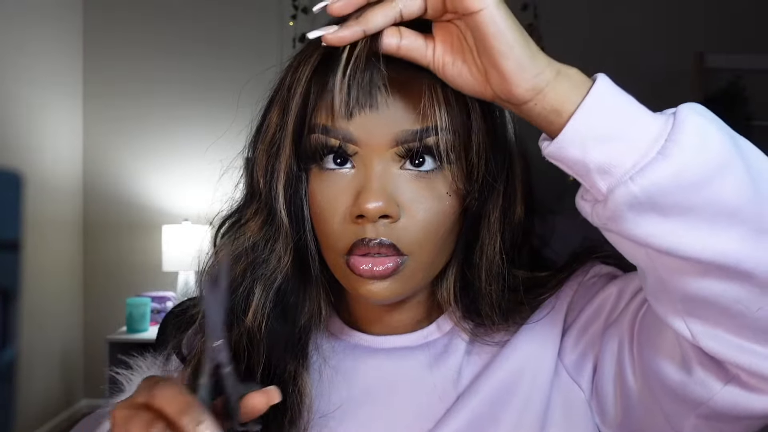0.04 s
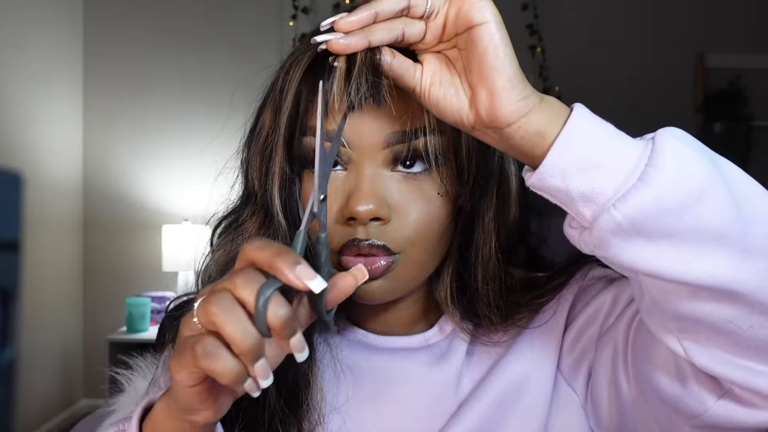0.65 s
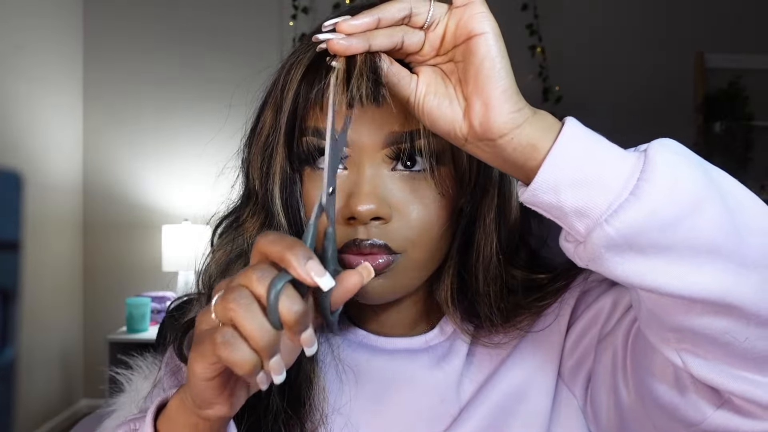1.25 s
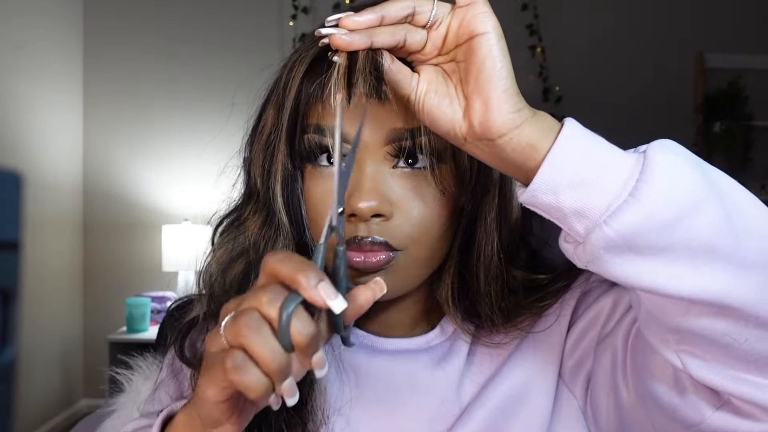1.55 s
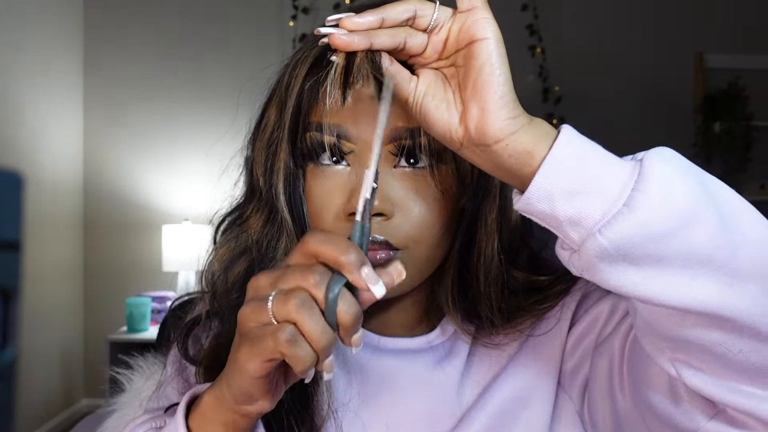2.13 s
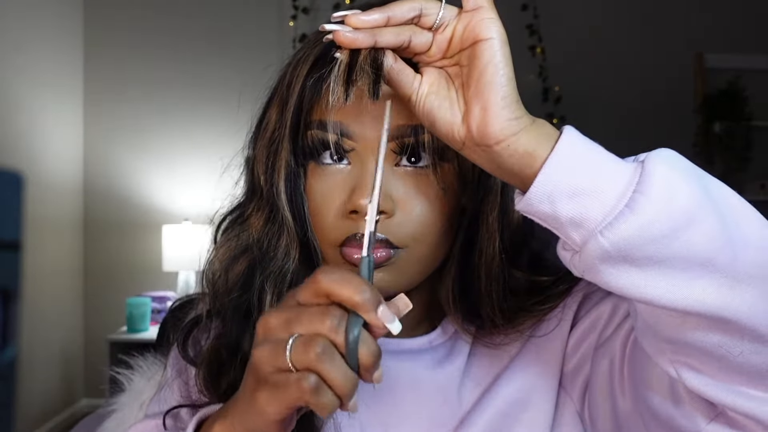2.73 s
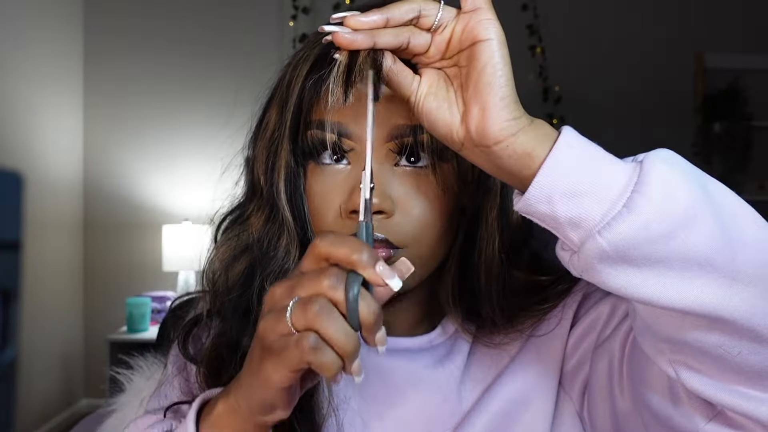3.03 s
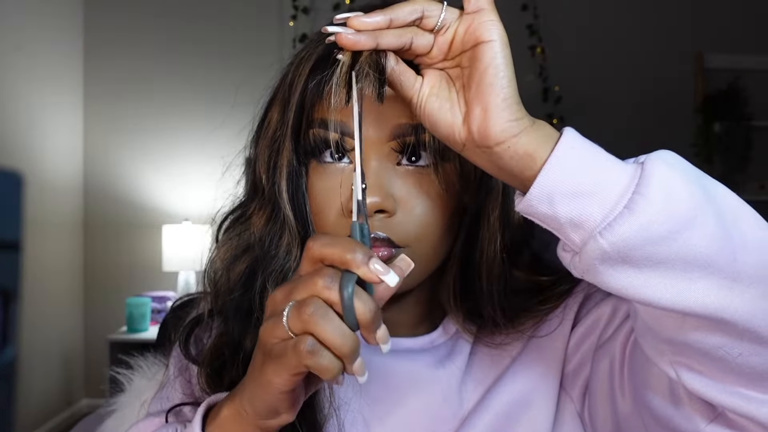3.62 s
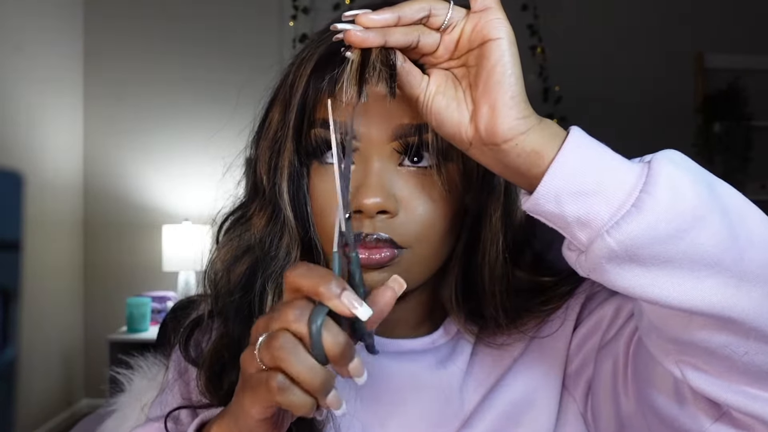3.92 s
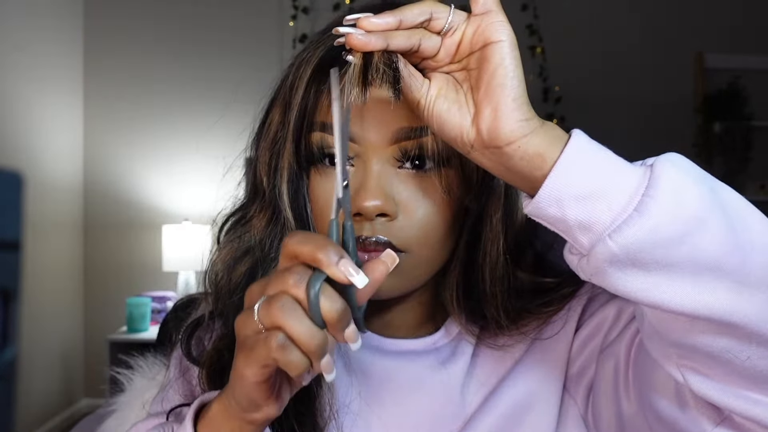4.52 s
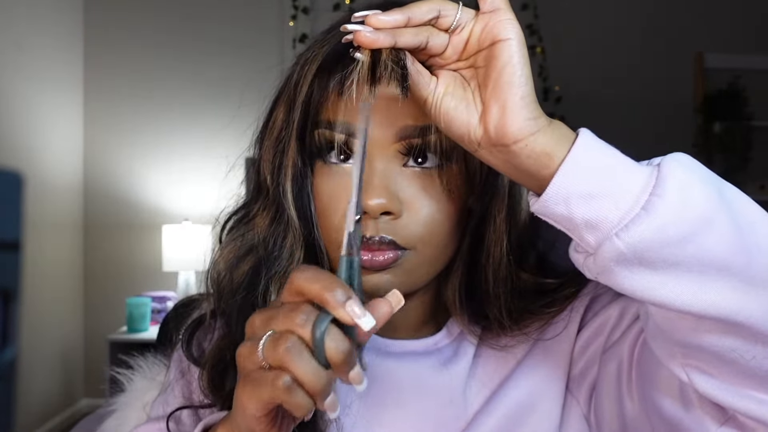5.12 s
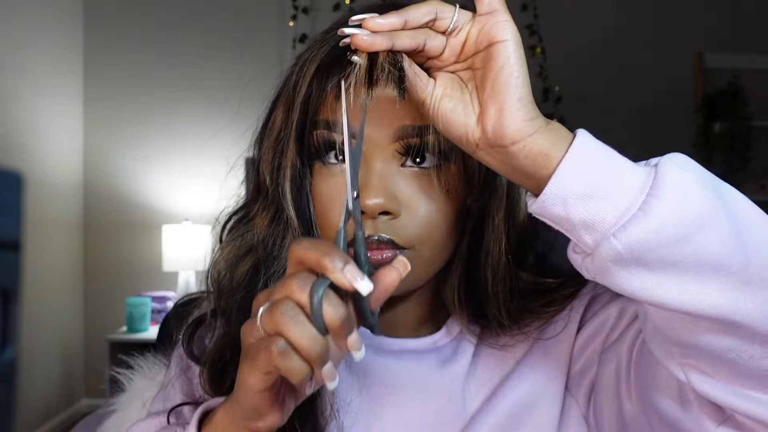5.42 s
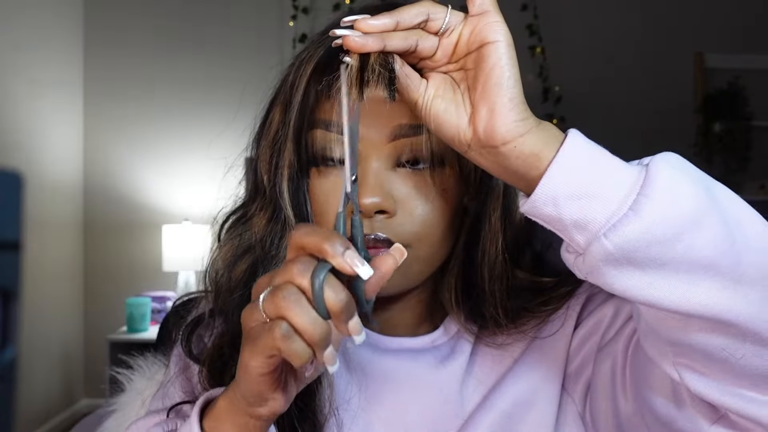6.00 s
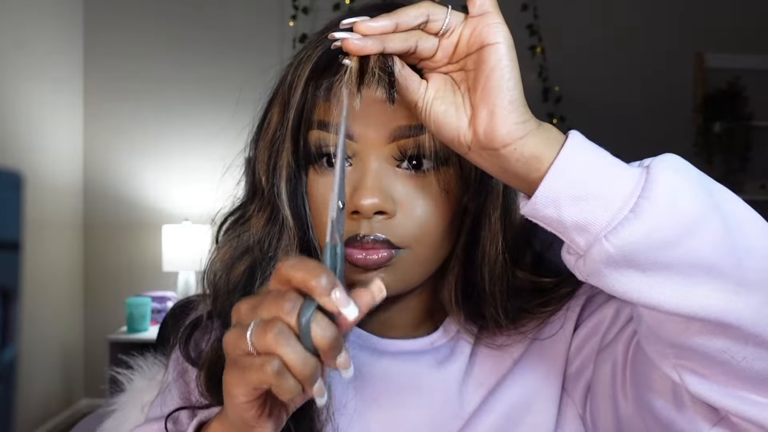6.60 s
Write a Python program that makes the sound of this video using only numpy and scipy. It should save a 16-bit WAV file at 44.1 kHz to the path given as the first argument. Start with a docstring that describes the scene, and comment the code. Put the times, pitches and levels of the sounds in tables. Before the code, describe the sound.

Steel scissors snip through hair up close about a dozen times, each crisp crunch ending in a metallic clack, in a quiet room.

```python
"""A lock of hair squeaks faintly between the fingers, then steel scissors trim a fringe close by.
Each snip is a swelling crunch of hairs that ends in a clack as the scissors shut.
The blades then scrape open again, each time with a short falling squeak.
One soft, dull knock comes from farther off. The small, quiet bedroom adds a brief echo,
and a soft, steady rush of air fills it."""
import sys
import numpy as np
from scipy import signal
from scipy.fft import rfft, irfft
from scipy.io import wavfile

SR = 44100
rng = np.random.default_rng(int(sys.argv[2]) if len(sys.argv) > 2 else 0)


def master_out(mix):
    """Clip the mix to full scale and print it as 16-bit PCM to the path in sys.argv[1]."""
    frames = np.transpose(np.atleast_2d(mix))
    ceiling = np.clip(frames, -1, 1)
    pcm = np.round(ceiling * 32767).astype(np.int16)
    wavfile.write(sys.argv[1], SR, pcm)


N = 297675
TIME = np.arange(N) / SR

# Levels in the tables are relative: the functions set the final loudness.
# the scissors shut: (time [s], level [dB])
SNIPS = [(0.9493, -14), (1.3666, -12), (1.7325, -11.5), (2.1757, -11.5), (2.6407, -13), (3.1244, -12.5),
         (3.7252, -16.5), (4.2158, -12.5), (4.5999, -15.5), (4.9661, -14), (5.5783, -14.5), (6.106, -12),
         (6.5097, -14)]
# bite, how hard the edges press together, as the treble it gives a snip: (time [s], bite [dB])
BITE = [(0.95, -8.5), (1.4, -10.5), (2.17, -11), (2.64, -18.5), (3.7, -20), (4.6, -16.5), (6.1, -12.5)]
# the pitches that colour the brief, metallic clack: (frequency [Hz], width [Hz], level [dB])
CLACK_PITCHES = [(1220, 260, -21), (1910, 230, -10.5), (2620, 87, -22), (3440, 290, -13), (4270, 280, -9.5),
                 (4770, 318, 4), (4934, 158, 2.5), (6110, 330, -5), (6700, 350, -13), (7700, 210, -12),
                 (8750, 430, -23)]
# body and treble of the clack, averaged over all directions: (frequency [Hz], level [dB])
CLACK_BODY = [(300, -63), (1100, -14), (1900, -0.5), (2500, -9), (3300, -1), (4300, 13.5), (5100, 11.5),
              (6200, -2), (9000, -28)]
CLACK_TREBLE = [(3500, -25.5), (5000, -1), (6000, 4), (7300, -2), (9000, -4.5), (10500, -11.5),
                (15000, -12)]
# the sound of edges rattling, hairs being cut and blades sliding: (frequency [Hz], level [dB])
RATTLE_SPECTRUM = [(200, -70), (1500, -43), (3000, -14), (5000, 0), (6300, 7), (7500, -16), (9500, -1.5),
                   (10800, -13), (12300, -13), (15000, -23), (16000, -17)]
CRUNCH_SPECTRUM = [(600, -39), (1100, -2.5), (1600, -17), (2400, -7.5), (3200, -2.5), (3700, -11),
                   (4800, -6), (6000, -1.5), (7200, -7), (8300, -8.5), (11000, -14.5), (16000, -18)]
SLIDE_SPECTRUM = [(800, -21), (1800, -14.5), (2800, -7), (3700, -10.5), (5000, -2), (6300, -3), (7500, -7),
                  (9500, -13), (12000, -17), (16000, -22)]
# the blades slide open: (time [s], level [dB])
OPENINGS = [(1.0733, -32), (1.4698, -34), (1.8558, -36.5), (2.329, -42.5), (2.7867, -47), (3.282, -48.5),
            (3.8637, -42), (4.359, -39), (4.7455, -38.5), (5.132, -40), (5.758, -43), (6.2641, -37.5),
            (6.668, -42.5)]
# hair rubs between the fingers: (time [s], length [s], squeak level [dB], hiss level [dB])
RUBS = [(0.32, 0.074, -54, -64), (0.466, 0.011, -50.5, -54.5), (0.492, 0.065, -57.5, -63.5),
        (0.617, 0.093, -56, -59), (0.827, 0.049, -57, -63)]
# the squeak sinks as the fingers slow down along the lock: (time [s], pitch [Hz])
SQUEAK_PITCH = [(0.32, 3180), (0.355, 3190), (0.39, 2710), (0.5, 2600), (0.68, 2534), (0.88, 2500)]
# the hiss of rubbed hair: (frequency [Hz], level [dB])
HISS_SPECTRUM = [(1800, -15), (3200, -3), (4100, 1.5), (4700, -5), (5600, 2), (7000, -7), (8500, 3.5),
                 (9800, -1.5), (10700, -16), (16000, -34)]
# a soft, dull knock: (time [s], level [dB])
KNOCKS = [(1.604, -41)]
# its ringing tones: (frequency [Hz], width [Hz], level [dB])
KNOCK_TONES = [(546, 170, -3.5), (435, 60, 3.5), (594, 21, -2)]
# echoes off nearby surfaces: (delay [s], left level [dB], right level [dB])
ECHOES = [(.0087, -25, -23), (.0118, -22, -19), (.0224, -24, -22)]
# the tail, the wash of sound that lingers in the room: (frequency [Hz], level [dB])
TAIL_SPECTRUM = [(300, 15.5), (600, 8.5), (1200, 5), (2500, 7), (3400, 4.5), (4300, 2.5), (5500, 2),
                 (7000, 2), (9000, 4), (15000, -2)]
# how long it lingers: (frequency [Hz], time to fade by 60 dB [s])
TAIL_FADE = [(400, 0.4), (2400, 0.41), (5000, 0.3), (14000, 0.34)]
# how alike it is left and right; the bass is wider: (frequency [Hz], likeness [0 to 1])
TAIL_LIKENESS = [(1000, 0.56), (2700, 0.73), (4000, 0.9), (8000, 1)]
# the rush of air: (frequency [Hz], level [dB])
AIR_SPECTRUM = [(15, -79.5), (25, -40.5), (145, -6), (263, -3), (293, -5), (326, -5.5), (405, -6),
                (516, -9.5), (607, -3), (887, -12.5), (1610, -12), (2610, -20.5), (6560, -27),
                (13600, -32.5), (16000, -34)]
# drones in the rush: (frequency [Hz], width [Hz], left level [dB], right level [dB])
AIR_DRONES = [(438, 56, -72, -73), (621, 57, -87, -63.5), (1674, 100, -76.5, -80.5)]
# how alike the rush is left and right: (frequency [Hz], likeness [0 to 1])
AIR_LIKENESS = [(60, 0.37), (250, .5), (600, 0.48), (1500, 0.36), (5000, 0.72), (14000, 1)]
# which way it leans: (frequency [Hz], left minus right [dB])
AIR_BALANCE = [(60, 9), (130, -1), (260, 1), (500, -5.5), (1000, 2.5), (8000, -0.5)]

CLACK_DELAY_S = 0.001   # the clack sounds this long after each snip's time, just after the crunch stops
USUAL_BITE_DB = -13.0
OPPOSITE = np.array([[1], [-1]])   # plus on the left, minus on the right


def clacks(level_db=17.0, vary_db=2.0, upper_hz=5500):
    """The scissors hit their stop with a metallic clack; more bite makes its upper pitches louder."""
    times, snip_db, bite_db = snips()
    clack = np.zeros(N)
    for hz, width_hz, pitch_db in CLACK_PITCHES:
        boost_db = bite_db - USUAL_BITE_DB if hz > upper_hz else 0
        strength_db = snip_db + pitch_db + boost_db + rng.normal(0, vary_db, len(times))
        clack += resonate(taps(times + CLACK_DELAY_S, strength_db + level_db), hz, width_hz)
    # narrow blades give off no bass, and the time in contact softens the top
    clack = keep_band(clack, "band", [900, 8800], order=3)
    # high and low waves cross the steel at different speeds, so the clack takes a cycle to build
    return clack - 2 * resonate(clack, hz=5000, width_hz=6000)


def clacks_to_walls(treble_db=15.0, bite_share=0.7):
    """Sound reaches the walls from every side of the scissors, so the clack's pitches blur together."""
    times, snip_db, bite_db = snips()
    stops = times + CLACK_DELAY_S
    hz = frequencies(TIME)
    body = rfft(taps(stops, snip_db)) * from_db(at_hz(CLACK_BODY, hz))
    bright_taps = taps(stops, snip_db + bite_share * bite_db + treble_db)
    treble = rfft(bright_taps) * from_db(at_hz(CLACK_TREBLE, hz))
    return irfft(body + treble, N)


def rattle(level_db=-3.0, fade_s=0.0018):
    """The edges rattle against each other for an instant after the stop."""
    times, snip_db, bite_db = snips()
    hits = taps(times + CLACK_DELAY_S, snip_db + bite_db + level_db)
    force = signal.lfilter([1], [1, -np.exp(-1 / (fade_s * SR))], hits + 1e-18)   # each hit dies away
    noise = colour(rng.standard_normal(N), RATTLE_SPECTRUM)
    return keep_band(force * noise, "high", 1500)


def crunch(level_db=-27.5, swell_db=15.5, usual_swell_s=0.018, stop_s=0.00044):
    """The closing blades speed up and cut ever more hairs; with more bite they grip earlier."""
    force = np.zeros(N)
    for shut, snip_db, bite_db in zip(*snips()):
        swell_s = usual_swell_s * from_db(0.19 * (bite_db - USUAL_BITE_DB))   # time to grow by swell_db
        swells_left = np.clip((shut - TIME) / swell_s, 0, 10)
        fade = np.exp(-np.clip((TIME - shut) / stop_s, 0, 20))
        force += from_db(snip_db + level_db - swell_db * swells_left) * fade
    return force * colour(grains(per_s=8000, spread_db=5.5), CRUNCH_SPECTRUM)


def blade_scrapes(level_db=-12.0, usual_db=-40.0, usual_length_s=0.027, ease_s=0.035):
    """Edge scrapes along edge as the blades part, easing off as they open."""
    force = np.zeros(N)
    for start, db in OPENINGS:
        length_s = usual_length_s * from_db(0.77 * (usual_db - db))   # firmer is over sooner
        easing = np.exp(-np.abs(TIME - start) / ease_s)
        force += from_db(db + level_db) * stroke(start, length_s, rise_s=0.0013, fall_s=0.025) * easing
    return force * colour(grains(per_s=3500, spread_db=3.5), SLIDE_SPECTRUM)


def blade_squeaks(level_db=-21.0, start_hz=3200, end_hz=1550, glide_s=0.025):
    """Each opening has a short falling squeak, louder when the scrape is louder."""
    loudest_db = max(db for _, db in OPENINGS)
    out = np.zeros(N)
    for start, db in OPENINGS:
        travel = np.clip((TIME - start) / glide_s, 0, 1)
        pitch = start_hz * (end_hz / start_hz) ** travel   # falls as the blades' crossing point moves
        gain = from_db(loudest_db + level_db + 1.05 * (db - loudest_db))
        arch = np.sqrt(4 * travel * (1 - travel))   # fades in, then out
        out += gain * arch * np.sin(2 * np.pi * np.cumsum(pitch) / SR)
    return out * wobble(up_to_hz=180)


def hair_rubs(level_db=-4.0, rough_db=-13.0, rough_width_hz=700, flutter_db=2.0):
    """Hair sticks and slips between the fingers: a thin, rough-edged squeak and a dry hiss."""
    pitch = np.interp(TIME, *np.transpose(SQUEAK_PITCH))
    slips = glide(grains(per_s=2300, spread_db=3.0), pitch, rough_width_hz)
    rough_edge = from_db(rough_db) * glide(slips, pitch, rough_width_hz)
    squeak = normalise(glide(slips, pitch, width_hz=130) + rough_edge)
    hiss = colour(grains(per_s=3400, spread_db=2.0), HISS_SPECTRUM)
    out = np.zeros(N)
    for start, length_s, squeak_db, hiss_db in RUBS:
        # the squeak catches at once; the hiss grows as the lock gathers speed
        out += from_db(squeak_db) * stroke(start, length_s, rise_s=0.003, fall_s=0.0075) * squeak
        out += from_db(hiss_db) * stroke(start, length_s, rise_s=0.017, fall_s=0.013) * hiss
    unsteady_grip = from_db(flutter_db * wobble(up_to_hz=67))
    return from_db(level_db) * unsteady_grip * out


def knock(level_db=36.5, soft_hz=560, soft_width_hz=380):
    """A padded bump sets something hollow ringing."""
    hit = taps(*np.transpose(KNOCKS))
    padded = resonate(resonate(hit, soft_hz, soft_width_hz), soft_hz, soft_width_hz)
    ring = sum(from_db(db) * resonate(padded, hz, width_hz) for hz, width_hz, db in KNOCK_TONES)
    return from_db(level_db) * ring


def room(x, tail_db, build_s=0.0042):
    """The walls send back a few clear echoes, then a tail in which each band fades at its own pace."""
    t = TIME[:SR // 2]
    hz = frequencies(t)
    alike = at_hz(TAIL_LIKENESS, hz)
    edges_hz = np.geomspace(100, 20000, 9)
    bands = []
    for low, high in zip(edges_hz, edges_hz[1:]):
        band = from_db(at_hz(TAIL_SPECTRUM, hz)) * (hz >= low) * (hz < high)
        fade = from_db(-60 * t / at_hz(TAIL_FADE, np.sqrt(low * high)))
        bands.append((band, fade))
    # the hand shifts between snips, so each gets its own fine pattern of reflections
    halfway = [round((a[0] + b[0]) / 2 * SR) for a, b in zip(SNIPS, SNIPS[1:])]
    out = np.zeros((2, N + len(t)))
    for start, end in zip([0] + halfway, halfway + [N]):
        noise = stereo_spectrum(len(t), alike) / np.sqrt(2)
        tail = sum(irfft(noise * band, len(t)) * fade for band, fade in bands)
        response = from_db(tail_db) * np.clip(t / build_s, 0, 1) * tail
        for delay_s, left_db, right_db in ECHOES:
            response[:, round(delay_s * SR)] += from_db([left_db, right_db])
        out[:, start:end + len(t) - 1] += signal.fftconvolve(x[None, start:end], response, axes=1)
    return out[:, :N]


def air(rush_db=-60.0):
    """A steady rush, like a distant vent, with a few faint drones in it."""
    hz = frequencies(TIME)
    lean = from_db(OPPOSITE * at_hz(AIR_BALANCE, hz) / 2)
    rush = irfft(stereo_spectrum(N, at_hz(AIR_LIKENESS, hz)) * lean, N)
    out = from_db(rush_db) * colour(rush, AIR_SPECTRUM)
    for centre_hz, width_hz, left_db, right_db in AIR_DRONES:
        broad = resonate(rng.standard_normal(N), centre_hz, 2 * width_hz)
        drone = resonate(broad, centre_hz, 2 * width_hz)
        out += from_db([[left_db], [right_db]]) * normalise(drone)
    return out


def snips():
    """Time, level and bite of every snip."""
    times, snip_db = np.transpose(SNIPS)
    return times, snip_db, np.interp(times, *np.transpose(BITE))


def taps(times, levels_db):
    """One sharp click for each contact."""
    out = np.zeros(N)
    out[np.round(np.asarray(times) * SR).astype(int)] = from_db(levels_db)
    return out


def grains(per_s, spread_db):
    """Tiny snaps and slips of uneven size at random moments."""
    clicks = (rng.random(N) < per_s / SR) * rng.choice([-1, 1], N)
    return clicks * from_db(spread_db * np.clip(rng.standard_normal(N), -2, 2))


def stroke(start, length_s, rise_s, fall_s):
    """Rubbing sets in, holds while the surfaces move, and dies away."""
    t = TIME - start
    return np.clip(t / rise_s, 0, 1) * np.exp(-np.clip((t - length_s) / fall_s, 0, 20))


def wobble(up_to_hz):
    """A smooth random wavering around zero."""
    return normalise(keep_band(rng.standard_normal(N), "low", up_to_hz))


def stereo_spectrum(length, alike):
    """The spectrum of left and right noise: unrelated where alike is 0, the same where it is 1."""
    shared, side = rfft(rng.standard_normal((2, length)))
    return np.sqrt(1 + alike) * shared + np.sqrt(1 - alike) * side * OPPOSITE


def resonate(x, hz, width_hz):
    """Make a sound ring at one pitch; a smaller width rings longer."""
    r = np.exp(-np.pi * width_hz / SR)
    feedback = [1, -2 * r * np.cos(2 * np.pi * hz / SR), r * r]
    return signal.lfilter(np.array([1, 0, -1]) * (1 - r * r) / 2, feedback, x + 1e-18)


def glide(x, pitch, width_hz):
    """Make a sound ring at a moving pitch, at strength 1."""
    turn = np.exp(2j * np.pi * np.cumsum(pitch) / SR)
    ring = signal.lfilter([1], [1, -np.exp(-np.pi * width_hz / SR)], x / turn)
    return normalise(np.real(turn * ring))


def keep_band(x, kind, hz, order=2):
    """Let the lows, the highs or a band between them through."""
    return signal.sosfilt(signal.butter(order, hz, kind, fs=SR, output="sos"), x)


def colour(x, spectrum):
    """Shape a noise's lows and highs by a table, at strength 1."""
    gains = from_db(at_hz(spectrum, frequencies(x)))
    return normalise(irfft(rfft(x) * gains, x.shape[-1]))


def at_hz(table, hz):
    """Read between a table's rows, with octaves evenly spaced."""
    table_hz, values = np.transpose(table)
    return np.interp(np.log(np.maximum(hz, 1)), np.log(table_hz), values)


def frequencies(x):
    """The frequencies in a signal's spectrum."""
    return np.arange(x.shape[-1] // 2 + 1) * SR / x.shape[-1]


def normalise(x):
    """Scale to an average strength (rms) of 1."""
    return x / np.sqrt(np.mean(x ** 2) + 1e-20)


def from_db(db):
    """Turn decibels into a multiplier."""
    return 10 ** (np.asarray(db) / 20)


def stereo_microphone(x, tilt_db=0.27, bent_db=-22.5, delay_s=0.00025):
    """Sound bent round the microphone's body colours left and right in opposite ways."""
    bent = from_db(bent_db) * np.interp(TIME - delay_s, TIME, x)
    return x * from_db(-tilt_db * OPPOSITE) + bent * OPPOSITE


def scene(friction_room_db=-1.0):
    """The scissors are just in front of the microphone; the knock is farther off."""
    friction = crunch() + blade_scrapes() + hair_rubs()
    far = knock()
    near = stereo_microphone(clacks() + rattle() + blade_squeaks() + friction)
    to_walls = clacks_to_walls() + from_db(friction_room_db) * friction
    echoes = room(to_walls, tail_db=-38.5) + room(far, tail_db=-37.5)
    return near + far + echoes + air()


def record(dry):
    """The highest treble, above 15800 Hz, is cut steeply."""
    return signal.sosfilt(signal.ellip(10, 0.1, 70, 15800, fs=SR, output="sos"), dry)


dry = scene()
out = record(dry)
master_out(out)
```